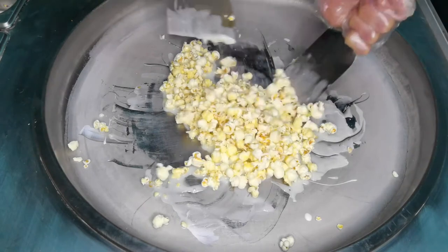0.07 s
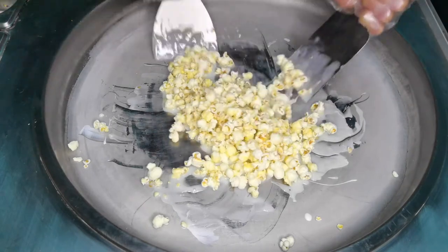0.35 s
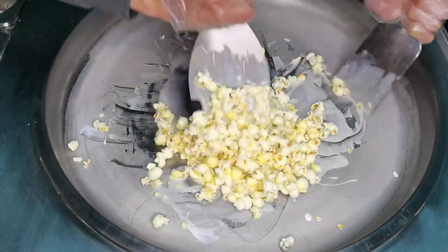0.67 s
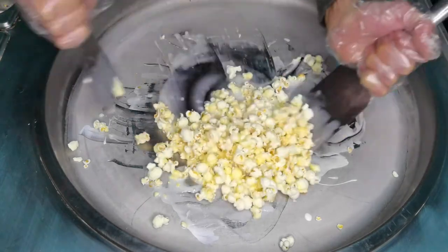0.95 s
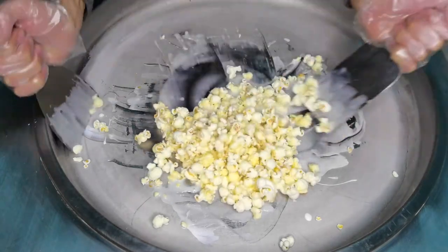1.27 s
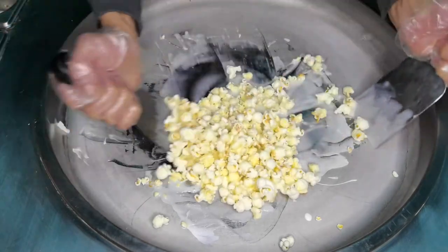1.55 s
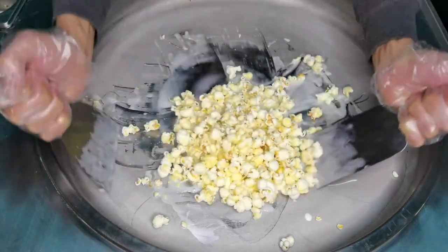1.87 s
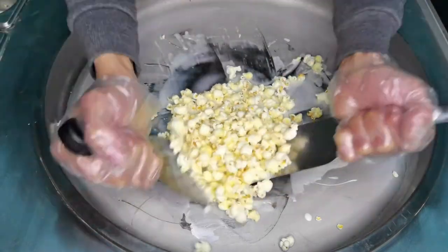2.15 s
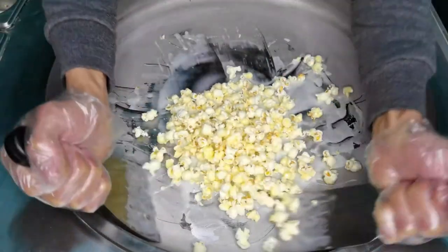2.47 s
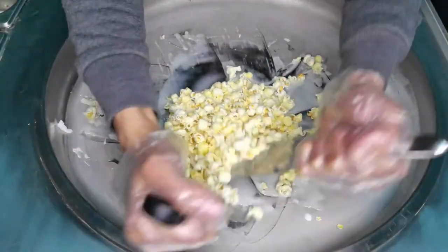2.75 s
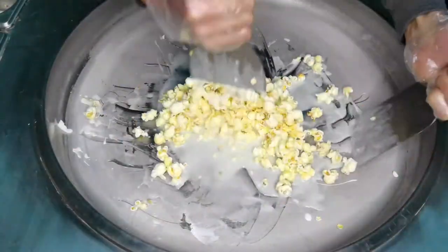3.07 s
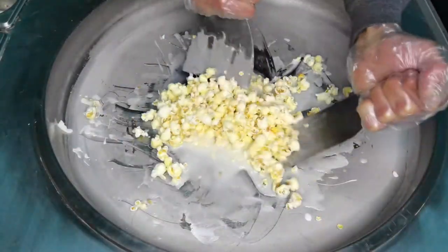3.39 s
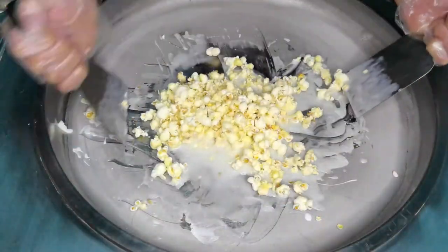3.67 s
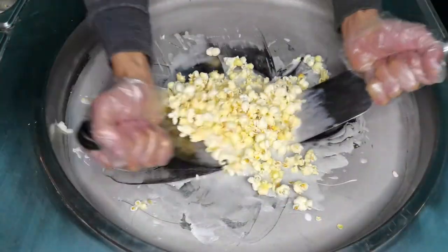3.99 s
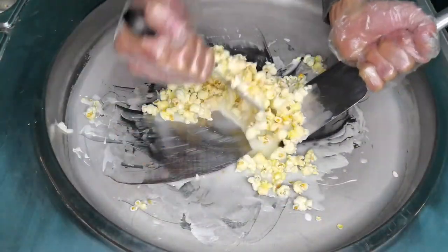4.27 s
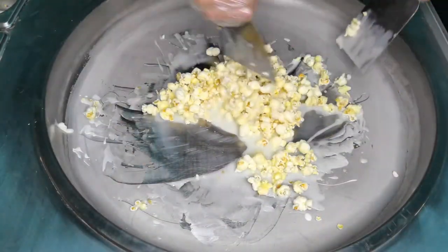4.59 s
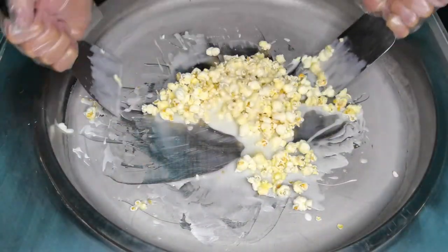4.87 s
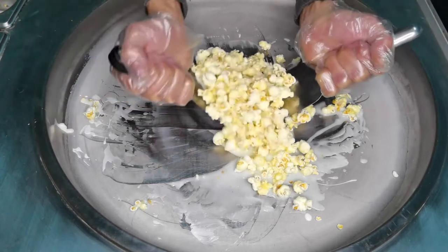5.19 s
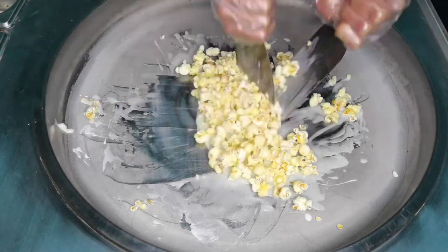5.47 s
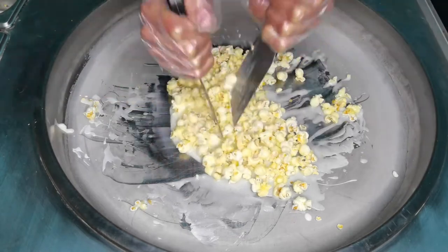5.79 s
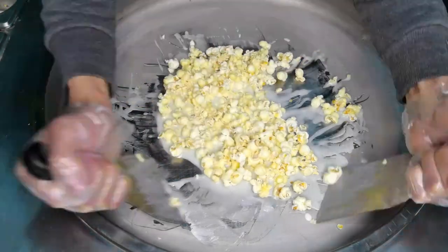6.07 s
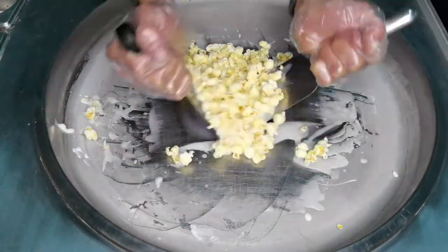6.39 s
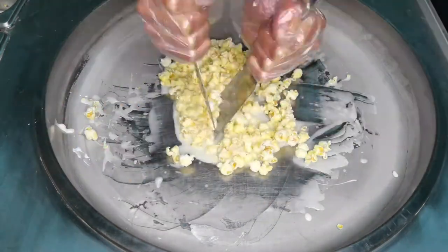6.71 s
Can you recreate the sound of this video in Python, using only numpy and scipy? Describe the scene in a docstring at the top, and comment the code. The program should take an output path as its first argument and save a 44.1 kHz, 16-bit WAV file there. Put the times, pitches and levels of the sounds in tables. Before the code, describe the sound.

Close by, metal spatulas clink down on a frozen steel plate and push through the frost in brief, gritty, slightly ringing strokes. Two clanging chops come early and two more later, with uneven scrapes and taps between them. Then the blades cut into a heap of popcorn and cream in a fast run of dry knocks and swishes, all over the soft low rumble of the cooling unit.

```python
"""Spatulas on a cold plate

Two steel spatulas work frozen cream and popcorn on a round cold plate. Impacts excite the modes of
blade and plate: each landing clinks, and four hard chops set the whole plate clanging. Friction
hisses as a blade is pushed through the frost. Near the end come quick flicks and dry knocks.
The cooling machine rumbles below."""
import sys
import numpy as np
from scipy import signal
from scipy.fft import rfft, irfft
from scipy.io import wavfile

SR = 44100
rng = np.random.default_rng(int(sys.argv[2]) if len(sys.argv) > 2 else 0)


def transcribe(signal):
    """Save signal, clipped to [-1, 1], as a 16-bit WAV file at the path in sys.argv[1]."""
    frames = np.atleast_2d(signal).T
    limited = np.clip(frames, -1, 1)
    pcm = np.round(limited * 32767).astype(np.int16)
    wavfile.write(sys.argv[1], SR, pcm)


N = 301644
TIME = np.arange(N) / SR
CLOCK = TIME[::64]  # time axis of the slow controls [s]


# how the chopped plate radiates: (frequency [Hz], level [dB])
CLANG_SPECTRUM = [(60, -9), (155, -11), (230, -9.5), (380, -7), (600, -1), (850, 0.5), (1550, -0.5),
                  (1950, -0.5), (2700, 1.5), (5000, 1)]
# an edge chops down: (time [s], clang [dB], crack [dB], corner of the blow [Hz], bass t60 [s],
# blade mode [Hz], blade level [dB], opening rattle [dB])
CHOP_BLOWS = [(.334, -26, -28, 490, 0.49, 659.5, -37, 4.5), (1.306, -26.5, -31, 684, 0.6, 680, -29.5, 3.5),
              (4.1844, -21, -32, 967, 0.69, 1032, -42, 3), (5.254, -23.5, -32.5, 930, 0.62, 847, -32.5, 7)]
def chops(rattle_s=0.034, thump_hz=52, thump_db=-32, ring_stops_at_s=5.395):
    """Impulse excitation: a hard edge wakes the plate's crowded modes and shakes the cabinet."""
    out, t = np.zeros((2, N)), np.arange(SR) / SR
    mode_hz, _, _, mode_db = np.transpose(PLATE_MODES)
    for s, clang_db, crack_db, corner_hz, t60, blade_hz, blade_db, rattle_db in CHOP_BLOWS:
        dense = noise(len(t), lambda f: read(CLANG_SPECTRUM, f)
                      + blow_db(f, corner_hz, rise=1.5, fall=16.5)
                      + plate_peaks_db(f, mode_db, width_hz=10.3, peak=0.24))
        dense = reshape(dense, lambda f, age: -60 * age / t60 * (1 + f / 14000))  # treble dies first
        dense *= amp(rattle_db * np.exp(-(t / rattle_s) ** 4))  # the edge rattles on the steel
        modes = plate_ring(t, mode_db + blow_db(mode_hz, corner_hz, rise=1.5, fall=14), spread_db=0.5)
        clang = (amp(-5.5) * dense + amp(-5) * modes) * (1 - np.exp(-t / .0003))
        clang += .8 * pressure_pulse(t, width_s=.00018)
        clang += amp(thump_db) * np.exp(-t / 0.13) * np.sin(2 * np.pi * thump_hz * t)
        snap = amp(crack_db) * crack(t, decay_s=0.0024, chatter_db=-12, chatter_s=0.024)
        add(out, s, amp(clang_db) * clang + snap + blade_ring(t, blade_hz, blade_db, t60=0.5))
    return out * np.interp(TIME - ring_stops_at_s, [0, .003, .14], [1, .2, 0])  # the clang stops short


# the plate's many faint modes: (frequency [Hz], level [dB])
CLINK_SPECTRUM = [(60, -36), (150, 14), (240, -29), (380, -0.5), (850, -13.5), (1100, 3.5), (1400, -19),
                  (1850, -1.5), (2150, -16), (3500, -14.5), (5000, -22), (9000, -48), (16000, -11)]
# a blade lands flat; its two modes depend on grip and angle: (time [s], ring [dB], crack [dB],
# gain of low plate modes [dB], low blade mode [Hz], level [dB], high blade mode [Hz], level [dB])
FLAT_LANDINGS = [(-.012, -38, -51, -1, 1036, -35, 1810, -56), (.679, -42.5, -60, 2, 688, -42, 992, -49),
                 (0.922, -37.5, -38, -1.5, 1040, -42.5, 1790, -44),
                 (1.154, -60, -37.5, 1, 606, -43.5, 3460, -48.5),
                 (1.5794, -45.5, -39, 16, 452, -64, 6280, -47),
                 (1.842, -46.5, -51, 5, 1052, -40, 1810, -51),
                 (2.021, -36, -37.5, -19, 610, -42, 2260, -47),
                 (2.461, -35.5, -36, -3.5, 578, -34.5, 2336, -45),
                 (2.532, -34.5, -40.5, 4, 594, -40.5, 1026, -47),
                 (3.174, -28.5, -36.5, -2, 1021, -27, 2300, -41),
                 (3.825, -31, -33.5, -11, 680, -33.5, 1080, -42),
                 (3.851, -33, -41, -2, 480, -36, 1940, -52), (4.863, -31, -34, -3.5, 1064, -34, 1826, -37),
                 (4.984, -36, -39.5, -6, 492, -43, 698, -38)]
def landings(blade_t60=0.25, body_db=-12):
    """Free vibration: plate and blade clink at their natural frequencies after a flat impact."""
    out, t = np.zeros((2, N)), np.arange(SR * 3 // 5) / SR
    mode_hz, _, mode_db, _ = np.transpose(PLATE_MODES)
    for s, ring_db, crack_db, low_db, *blade_modes in FLAT_LANDINGS:
        modes = plate_ring(t, mode_db + low_db * (mode_hz < 500))
        dense = noise(len(t), lambda f: read(CLINK_SPECTRUM, f)) * np.exp(-t / 0.08)
        body = noise(len(t), lambda f: read(BODY_SPECTRUM, f)) * np.exp(-t / 0.1)
        ring = amp(ring_db) * (amp(-1.5) * modes + amp(-6.5) * dense + amp(body_db) * body)
        for hz, db in np.reshape(blade_modes, (2, 2)):
            ring += blade_ring(t, hz, db, blade_t60)
        snap = amp(crack_db) * crack(t, decay_s=0.0085, chatter_db=-0.5, chatter_s=0.036)
        add(out, s, ring * (1 - np.exp(-t / 0.0027)) + snap)
    return out


# modes of the plate: (frequency [Hz], t60 [s], weight in a landing or rub [dB], weight in a chop [dB])
PLATE_MODES = [(155.3, 0.62, -2, 2.5), (197, 0.72, -6.5, 2.5), (310.6, 0.93, -3.5, -2),
               (347.5, 0.49, 0, -26), (401, 0.24, 1.5, 0.5), (455.5, 0.46, -1.5, 7.5), (585, 0.24, -7.5, 9),
               (680, 0.38, -3, 8), (762.5, 0.3, -5.5, 2), (860, 0.7, -25, 3), (1040, 0.21, 3, 11),
               (1080, 0.091, -14, 9.5), (1146, 0.46, -11, 7), (1210, 0.2, -1, 10), (1298, 0.36, -22, 4),
               (1370, .4, -23, 10.5), (1430, 0.31, -16, 10), (1480, 0.26, -17, -18),
               (1557, 0.11, -1.5, -30), (1748, 0.86, -10, -26), (1884, 0.12, -4, 9),
               (1940, 0.24, -11, -21.5), (2310, 0.19, -8.5, -36), (2665, 0.068, 0, -24),
               (3566, 0.27, -11.5, -34)]
def plate_ring(t, weights_db, spread_db=2):
    """Modal superposition: damped sines whose weights vary, as each blow meets another spot."""
    hz, t60 = np.transpose(PLATE_MODES)[:2, :, None]
    spot, skew = rng.standard_normal((2, len(PLATE_MODES), 1))
    height = amp(weights_db[:, None] + spread_db * spot)
    phase = 2 * np.pi * hz * t + rng.uniform(-2.27, 1.99, hz.shape)
    stereo_phase = skew * np.arccos(np.clip(read(STEREO_CORRELATION, hz), -1, 1)) / 2
    onset_rms = np.sqrt(np.sum((height * np.cos(stereo_phase)) ** 2) / 2)
    fading = height * amp(-60 * t / t60) / onset_rms
    return np.array([(fading * np.sin(phase + side * stereo_phase)).sum(0) for side in (-1, 1)])


def plate_peaks_db(f, weights_db, width_hz, peak):
    """Resonance: each plate mode lifts a Lorentzian peak out of a broad excitation."""
    peaks = sum(gain / (1 + ((f - hz) / width_hz) ** 2)
                for (hz, *_), gain in zip(PLATE_MODES, amp(weights_db)))
    return 20 * np.log10(1 + peak * peaks)


def blade_ring(t, hz, db, t60):
    """Damped oscillation: one bending mode of a blade, out of step between left and right."""
    phase = 2 * np.pi * hz * t + 1.1 * rng.standard_normal((2, 1))
    return np.sqrt(2) * amp(db - 60 * t / t60) * np.sin(phase)


# steel striking steel: (frequency [Hz], level [dB])
CRACK_SPECTRUM = [(300, -9.5), (1500, -7.5), (3200, -5.5), (5000, -3), (7500, 0), (9100, 4), (11500, 1.5),
                  (16000, -7.5)]
def crack(t, decay_s, chatter_db, chatter_s):
    """Contact transient: a bright snap, then the blade chatters to rest in its uneven high modes."""
    ripple_hz, ripple_db = np.linspace(0, SR / 2, 200), 4 * rng.standard_normal(200)
    steel = noise(len(t), lambda f: read(CRACK_SPECTRUM, f) + np.interp(f, ripple_hz, ripple_db), 2.8)
    return steel * (np.exp(-t / decay_s) + amp(chatter_db) * np.exp(-t / chatter_s))


def blow_db(hz, corner_hz, rise, fall):
    """Band-limited excitation: a blow's spectrum rises, then falls past a corner, in dB per octave."""
    octaves = np.log2((hz + 1) / corner_hz)
    return -10 * np.log10(10 ** (-rise * octaves / 10) + 10 ** (fall * (octaves - .5) / 10))


def pressure_pulse(t, width_s):
    """Impulsive radiation: a blow sends out one pulse with a slightly rounded front."""
    age = t / width_s
    return 1.6 * (age - 1) * np.exp(-age) * (1 - np.exp(-(6 * age) ** 2))


# an edge crunches through the heap onto the plate:
# (time [s], ring [dB], corner of the blow [Hz], tick [dB], pulse [dB], crunch [dB], half length [s])
DRY_KNOCKS = [(5.698, -30.5, 920, -45.5, -20.5, -35, 0.015), (5.766, -43, 700, -43, -29, -42, .007),
              (5.803, -37, 350, -62, -17.5, -34.5, 0.022), (5.8927, -26, 710, -56, -31, -41, .028),
              (5.913, -31.5, 580, -41, -34, -37.5, 0.024), (5.96, -28.5, 300, -60, -41, -49, 0.011),
              (5.97, -36, 695, -47, -36, -41.5, 0.029), (6.614, -30.5, 800, -46, -37, -38.5, 0.022),
              (6.646, -46, 500, -42, -19.5, -34, 0.034), (6.666, -33.5, 500, -52, -25, -38.5, 0.013),
              (6.783, -34, 600, -37.5, -20.5, -35, .015), (6.801, -28, 517, -57, -31, -35.5, .015),
              (6.829, -27.5, 550, -45, -30, -32, 0.011)]
def knocks():
    """Impact transients: quick, dry knocks, each a pulse, a tick and a very short ring."""
    out, t = np.zeros((2, N)), np.arange(8192) / SR
    for s, ring_db, corner_hz, tick_db, pulse_db, *_ in DRY_KNOCKS:
        ring = noise(len(t), lambda f: blow_db(f, corner_hz, rise=5, fall=18.5)) * np.exp(-t / 0.013)
        tick = crack(t, decay_s=0.0028, chatter_db=-7, chatter_s=0.0039)
        pulse = pressure_pulse(t, width_s=0.00049)
        add(out, s, amp(pulse_db) * pulse + amp(ring_db) * ring + amp(tick_db) * tick)
    return out


# a blade speeds up through the frost, slows as food piles against it, and lifts:
# (start [s], speeding up [s], slowing [s], hiss at top speed [dB], hiss gained with speed [dB],
# brightness at top speed [dB], brightness gained with speed [dB], plate body [dB], lift fade [dB/s])
FROST_STROKES = [(-.02, 0.17, 0.094, -42, 7.5, 9, 20.5, -49, 273),
                 (0.379, 0.089, 0.1, -41.5, 2.5, 5.5, 13, -53.5, 195),
                 (.69, 0.086, 0.06, -50, 6.5, 10, -2, -65, 380),
                 (1, .08, 0.094, -41, 5.5, -1, -4, -47, 180), (1.24, .05, 0.03, -50.5, 5, 9, 13, -73, 150),
                 (1.348, 0.018, 0.11, -45, 3.5, -15.5, -12, -37.5, 165),
                 (1.595, 0.0066, 0.034, -37.5, 6, 25, 14.5, -53, 190),
                 (1.661, 0.095, 0.028, -46.5, 4, 11, 8, -53, 280),
                 (1.851, .04, 0.11, -49.5, -3, 9.5, 0, -53, 150),
                 (2.022, .012, 0.13, -33.5, 10, 4.5, 4, -45, 168),
                 (2.535, 0.039, 0.11, -36, 9.5, 4, 3.5, -44.5, 98),
                 (2.7, .18, 0.024, -49, -1.5, -7, -14.5, -50, 418),
                 (3.279, 0.099, 0.076, -35, 10, 21.5, 25, -49.5, 288),
                 (3.958, 0.086, 0.089, -35.5, 4.5, 13.5, 8, -47, 217),
                 (4.441, 0.09, 0.1, -64, 7, 17, -5, -56.5, 120),
                 (4.983, 0.16, 0.063, -33, 9.5, 6, 7.5, -46.5, 160)]
def scrapes(sing_db=-53, knee_db=-46):
    """Sliding friction: long pushes hiss at the edge and drive both blade and plate."""
    hisses, bodies, brights_db = np.stack([stroke(*row) for row in FROST_STROKES], axis=1)
    hiss, body = power_sum(hisses), power_sum(bodies)
    bright_db = np.average(brights_db, axis=0, weights=hisses ** 2)
    sing = amp(sing_db) * hiss / (hiss + amp(knee_db))  # levels off: hard pressure damps the blade
    return amp(1) * hiss * frost_hiss(bright_db) + amp(-4) * body * rubbed_plate() + sing * singing()


def stroke(start, speeding, slowing, hiss_db, swell_db, bright_db, brighten_db, body_db, lift_db_per_s):
    """Friction follows speed and load: speed makes it louder and brighter, load duller and heavier."""
    end = start + speeding + slowing
    slowness = np.interp(CLOCK, [start, start + speeding, end], [1, 0, 1])
    load = np.interp(CLOCK, [start, end], [-.5, .5])
    onset_db = -440 * np.clip(start - CLOCK, 0, 1)  # the edge bites at 440 dB/s
    lifted_s = np.clip(CLOCK - end, 0, 1)
    hiss = amp(hiss_db - swell_db * slowness + 2.5 * load + onset_db - lift_db_per_s * lifted_s)
    body = amp(body_db + 3.5 * load + onset_db - 114 * lifted_s)  # the plate dies away at 114 dB/s
    return hiss, body, bright_db - brighten_db * slowness - 5 * load


# frost breaking under a long push: (frequency [Hz], level [dB])
FROST_SPECTRUM = [(900, -8.5), (2000, 0), (2700, 0.5), (3600, -2), (4900, -3), (6300, 0), (7500, 0),
                  (9100, 2.5), (10500, 3), (12500, 1), (16000, -4)]
def frost_hiss(bright_db, broad_db=2.4, narrow_db=3.5, flutter_db=1.3):
    """Fracture noise: ice grains break, filtered by resonances that shift as the blade flexes."""
    def patches(hz, t, size):
        window = np.outer(*map(np.hanning, size))
        field = signal.fftconvolve(rng.standard_normal((len(hz), len(t))), window, "same")
        return field / field.std()
    def flex_db(hz, t):
        narrow = patches(hz, t, size=(5, 27)) * np.interp(hz, [2000, 11000], [1.25, .7])
        return broad_db * patches(hz, t, size=(15, 23)) + narrow_db * narrow
    def edge_angle_db(hz, t):
        # a steep edge fizzes high up; a flat one rasps in the middle
        tilt = read([(1500, -1.13), (3500, -0.46), (6000, -0.17), (11000, 0.26)], hz)
        return np.interp(t, CLOCK, bright_db) * tilt
    hiss = noise(N, lambda f: read(FROST_SPECTRUM, f), grain_db=2.9)
    hiss = reshape(hiss, lambda f, t: flex_db(f, t) + edge_angle_db(f, t), size=1024)
    return unit(hiss) * amp(flutter_db * wander(0.0037))


# broad response of the plate: (frequency [Hz], level [dB])
BODY_SPECTRUM = [(60, 1), (150, 7), (240, -7.5), (350, -5), (800, 8), (1100, 5), (1450, 3), (1800, -2),
                 (2500, -4), (4000, -12.5)]
def rubbed_plate(width_hz=26, peak=3.5, flutter_db=1, grain_db=3.1):
    """Forced vibration: friction drives the plate, which answers at its modes."""
    mode_db = np.transpose(PLATE_MODES)[2]
    body = noise(N, lambda f: read(BODY_SPECTRUM, f) + plate_peaks_db(f, mode_db, width_hz, peak),
                 grain_db)
    return body * amp(flutter_db * wander(0.013))


# resonances of a dragged blade: (frequency [Hz], half width [Hz], level [dB])
BLADE_RESONANCES = [(650, 12, -11), (1050, 43, -1), (1202, 27, -10.5), (1524, 67, -0.5), (1839, 49, 3.5),
                    (2380, 20, -1), (3500, 33, 0.5)]
def singing(swell_db=4):
    """Sustained resonance: friction keeps the blade ringing; its modes take turns as the grip changes."""
    voices = np.zeros((2, N))
    for hz, width, db in BLADE_RESONANCES:
        band = noise(N, lambda f: -20 * np.log10(1 + ((f - hz) / width) ** 2))
        voices += band * amp(db + swell_db * wander(.07))
    return unit(voices)


# hiss and thud of a short stroke, each: (frequency [Hz], level [dB])
FLICK_SPECTRUM = [(800, -14), (2000, -2.5), (3200, 0.5), (5000, -1), (9000, 5), (12500, 3.5), (16000, -2.5)]
THUD_SPECTRUM = [(30, -30), (80, -15), (150, 5.5), (250, -6.5), (450, -4.5), (700, -10), (1500, -56)]
# flicks over the plate: (peak time [s], half length [s], hiss [dB], plate body [dB], thud [dB])
SHORT_FLICKS = [(5.552, 0.012, -46, -43, -53), (5.646, 0.019, -51.5, -74, -78),
                (5.747, 0.02, -42, -47, -42), (5.87, 0.021, -50, -38, -36), (6.044, .017, -60, -35.5, -42),
                (6.138, .01, -44, -46.5, -51), (6.183, 0.048, -44.5, -45, -65),
                (6.239, 0.023, -45.5, -53.5, -63), (6.298, 0.01, -47, -41, -49),
                (6.333, 0.025, -46, -52, -65), (6.394, .011, -46, -46.5, -48),
                (6.454, 0.03, -37, -45.5, -53.5), (6.594, 0.011, -40, -39.5, -42),
                (6.732, 0.018, -45, -43, -43.5)]
def flicks(crackle_db=-13, crunch_hiss_db=-17, fade_to_rise=1.23):
    """Transient friction: flicks, and the crunch around each knock, are too brief for the blade to sing."""
    crunches = [(s, half, db + crunch_hiss_db, db, db) for s, *_, db, half in DRY_KNOCKS]
    at, half, *levels_db = np.transpose(list(SHORT_FLICKS) + crunches)[:, :, None]
    width = half * fade_to_rise ** np.where(CLOCK < at, -.5, .5)
    swell = np.exp(-np.minimum(abs((CLOCK - at) / width), 10) ** 1.73)
    hiss, body, thud = (power_sum(amp(db) * swell) for db in levels_db)
    frost = noise(N, lambda f: read(FLICK_SPECTRUM, f), grain_db=2.7) * amp(2.2 * wander(0.0081))
    crushed = amp(-5) * rubbed_plate(width_hz=24.6, peak=1.5, grain_db=4) + amp(crackle_db) * crackle()
    bass = noise(N, lambda f: read(THUD_SPECTRUM, f))
    return amp(-1.5) * hiss * frost + body * crushed + thud * bass


# a kernel breaking: (frequency [Hz], level [dB])
SNAP_SPECTRUM = [(500, -20), (1200, 3), (3000, -2), (6000, -14), (16000, -22)]
def crackle(per_s=260, spread_db=4, ring_s=0.00083):
    """Brittle fracture: kernels and ice crystals snap one by one, as a Poisson process."""
    breaks = (rng.random(N) < per_s / SR) * amp(spread_db * np.minimum(rng.exponential(1, N), 3))
    t = np.arange(512) / SR
    snap = noise(len(t), lambda f: read(SNAP_SPECTRUM, f)) * np.exp(-t / ring_s)
    return unit(signal.oaconvolve(breaks[None], snap, axes=1)[:, :N])


# a pressed blade judders: (peak time [s], half length [s], frequency [Hz], level [dB])
BLADE_JUDDERS = [(2.475, 0.038, 322, -36.5), (2.542, 0.052, 333.3, -38.5), (2.57, 0.027, 458, -37.5),
                 (2.616, 0.15, 458, -50.5)]
def judders():
    """Stick-slip oscillation: the blade groans briefly at its low bending mode."""
    out = np.zeros(N)
    for s, half, hz, db in BLADE_JUDDERS:
        tone = np.sqrt(2) * wavering_tone(hz, depth=0.0307, span_s=0.0046)
        swell = np.exp(-((TIME - s) / half) ** 2)
        out += amp(db - 0.5 + 2 * wander(.007)) * swell * tone
    return out * (TIME > BLADE_JUDDERS[0][0] - .014)  # the groan sets in abruptly


# the settling heap: (frequency [Hz], level [dB])
RUSTLE_SPECTRUM = [(600, -5), (1500, -0.5), (3000, -4.5), (5000, -8.5), (9000, 2.5), (16000, -3)]
# the edge catches a hard crumb: (time [s], level [dB])
CRUMB_TICKS = [(.108, -38), (0.68, -47), (1.359, -46), (1.529, -36.5), (1.967, -40), (1.986, -32),
               (2.4, -48), (4.449, -47.5), (5.944, -61), (6.132, -42.5), (6.299, -48)]
def light_contacts(rustle_db=-64.5, squeak_hz=1510, squeak_db=-58):
    """Contact noise: the heap rustles, hard crumbs tick and a lightly dragged edge squeaks."""
    out = noise(N, lambda f: read(RUSTLE_SPECTRUM, f), grain_db=4.3)
    out *= amp(rustle_db + 1.2 * wander(0.0089))
    t = np.arange(2048) / SR
    for s, db in CRUMB_TICKS:
        add(out, s, amp(db) * crack(t, decay_s=.002, chatter_db=-14, chatter_s=.008))
    squeak = amp(squeak_db) * wavering_tone(squeak_hz, depth=0.0027, span_s=.01)
    return out + squeak * np.interp(TIME, [4.56, 4.63, 4.73, 4.8], [0, 1, 1, 0])


# machine rumble and faint room hiss: (frequency [Hz], level [dB])
RUMBLE_SPECTRUM = [(15, -19), (28, -15), (52, 0.5), (76, -8), (115, 3), (175, -3.5), (300, -3), (500, -15),
                   (800, -15.5), (1300, -35), (2500, -48), (5300, -35), (16000, -26)]
# the cabinet is jolted: (time [s], level [dB])
CABINET_JOLTS = [(2.13, -47.5), (2.53, -46.5), (4.19, -46), (4.99, -47), (5.26, -65.5)]
def machine(rumble_db=-58.5, rise_s=.02, decay_s=0.26):
    """Structure-borne sound: the cooling machine rumbles, and each jolt briefly shakes its cabinet."""
    at, db = np.transpose(CABINET_JOLTS)[:, :, None]
    since = np.maximum(CLOCK - at, 0)
    jolts = amp(db) * (1 - np.exp(-since / rise_s)) * np.exp(-since / decay_s)
    cabinet = noise(N, lambda f: read(RUMBLE_SPECTRUM, f) - 10 * np.log10(1 + (f / 900) ** 2))
    rumble = noise(N, lambda f: read(RUMBLE_SPECTRUM, f)) * amp(rumble_db + wander(0.14))
    return rumble + np.interp(TIME, CLOCK, jolts.sum(0)) * cabinet


# likeness of left and right: (frequency [Hz], correlation [1])
STEREO_CORRELATION = [(100, 0.98), (250, 0.93), (500, 0.78), (1000, 0.16), (2000, 0), (16000, 0)]
def noise(size, gain_db, grain_db=0):
    """Partial coherence: coloured stereo noise, alike in the bass; grain makes it gritty."""
    grit = amp(grain_db * np.minimum(rng.exponential(1, size), 5))
    a, b = rfft(rng.standard_normal((2, size)) * grit)
    same = np.clip(read(STEREO_CORRELATION, np.fft.rfftfreq(size, 1 / SR)), -1, 1)
    middle, side = a * np.sqrt(1 + same), b * np.sqrt(1 - same)
    return unit(colour(irfft([middle + side, middle - side], size), gain_db))


def wavering_tone(hz, depth, span_s):
    """Frequency modulation: a sine whose pitch drifts at random."""
    return np.sin(2 * np.pi * np.cumsum(hz * (1 + depth * wander(span_s))) / SR)


def wander(span_s):
    """Random modulation of spread 1, with a new value every span_s."""
    knots = rng.standard_normal(4000)
    return np.interp(TIME / span_s, np.arange(len(knots)), knots) * np.sqrt(3 / 2)


def colour(x, gain_db):
    """Linear filtering by gain_db(frequency)."""
    return irfft(rfft(x) * amp(gain_db(np.fft.rfftfreq(x.shape[1], 1 / SR))), x.shape[1])


def reshape(x, gain_db, size=512):
    """Time-varying filtering by gain_db(frequency, time)."""
    frames = dict(fs=SR, nperseg=size, noverlap=size * 3 // 4)
    hz, t, spectra = signal.stft(x, **frames)
    return signal.istft(spectra * amp(gain_db(hz[:, None], t)), **frames)[1][:, :x.shape[1]]


def power_sum(envelopes):
    """Incoherent addition: slow envelopes sum in power and are spread over every sample."""
    return np.interp(TIME, CLOCK, np.linalg.norm(envelopes, axis=0))


def read(points, hz):
    """Interpolation of a spectrum on a log-frequency axis."""
    f, value = np.transpose(points)
    return np.interp(np.log(hz + 1), np.log(f + 1), value)


def amp(db):
    """Decibels to amplitude ratio."""
    return 10 ** (np.asarray(db) / 20)


def unit(x):
    """Normalisation of a stereo pair so that its middle has rms 1."""
    return x / np.sqrt(np.mean(x.mean(0) ** 2) + 1e-20)


def add(mix, s, sound):
    """Superposition of a stereo sound on the mix at time s."""
    at = round(s * SR)
    sound = sound[:, max(-at, 0):]
    part = mix[:, max(at, 0):][:, :sound.shape[1]]
    part += sound[:, :part.shape[1]]


def scene():
    """Superposition of everything on and under the plate."""
    plate = landings() + judders() + chops() + knocks() + scrapes() + flicks()
    return plate + light_contacts() + machine()


# response of the two microphones: (frequency [Hz], left gain [dB], right gain [dB])
MIC_RESPONSE = [(99, -4, -2.5), (3900, 1.8, 1.8), (4930, -2, -3), (6260, 0.5, -5.5), (7890, -5, -5),
                (8830, -19, 0), (10350, -15.5, -6), (12800, -11.5, -5), (16100, -7, 1)]
def record(dry, cutoff_hz=15900):
    """Frequency response: each microphone colours the sound, then a low-pass limits the band."""
    hz, *sides_db = np.transpose(MIC_RESPONSE)
    heard = colour(dry, lambda f: np.array([np.interp(f, hz, db) for db in sides_db]))
    low_pass = signal.firwin(511, cutoff_hz, window=("kaiser", 9), fs=SR)
    return signal.oaconvolve(heard, low_pass[None], "same")


dry = scene()
out = record(dry)
transcribe(out)
```